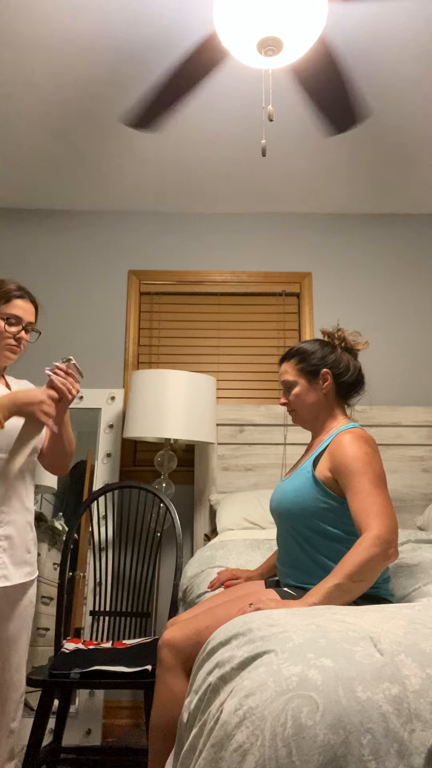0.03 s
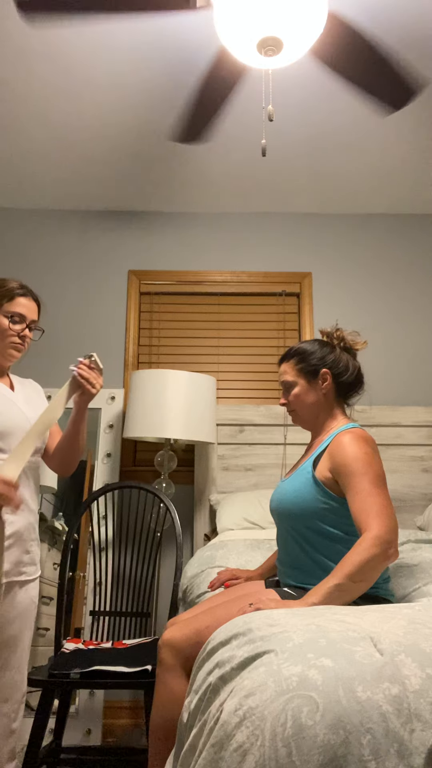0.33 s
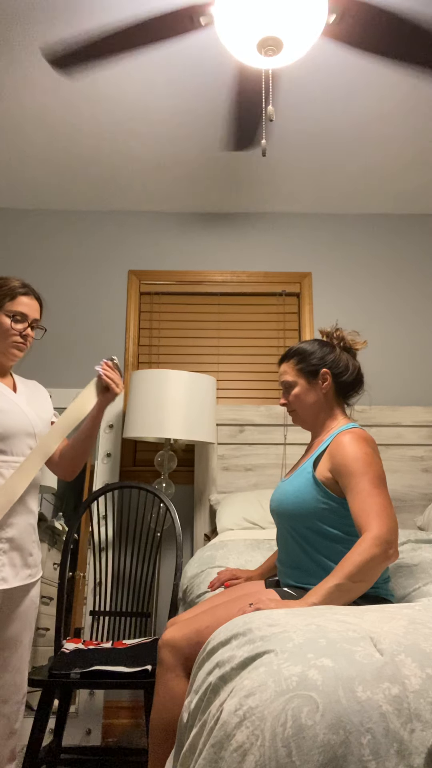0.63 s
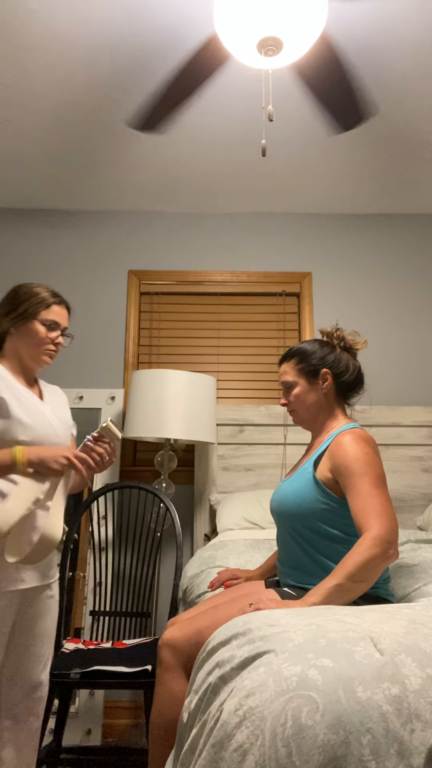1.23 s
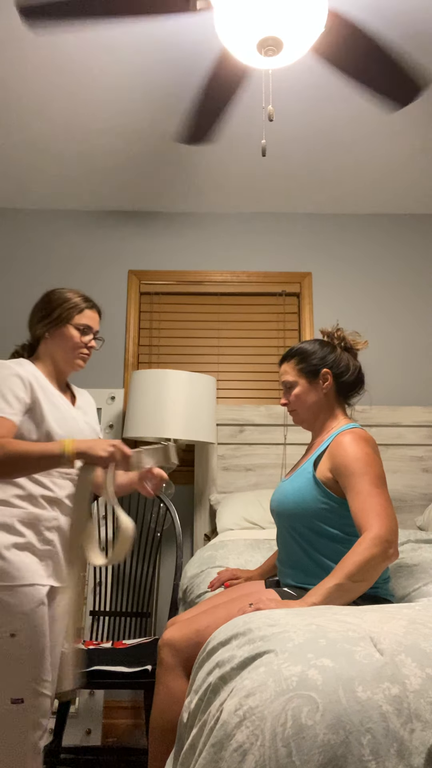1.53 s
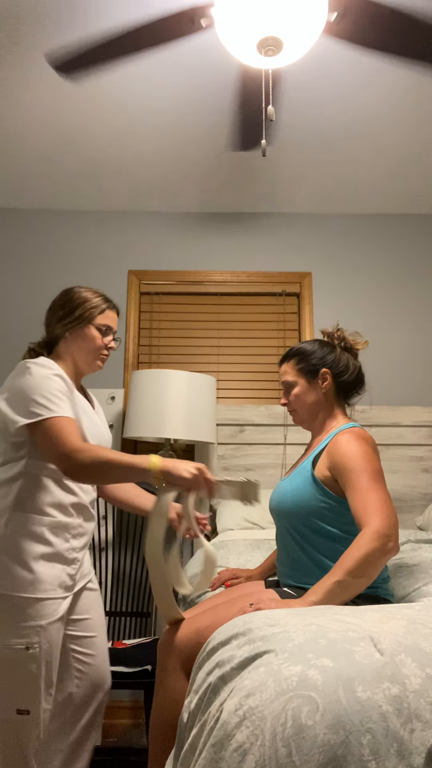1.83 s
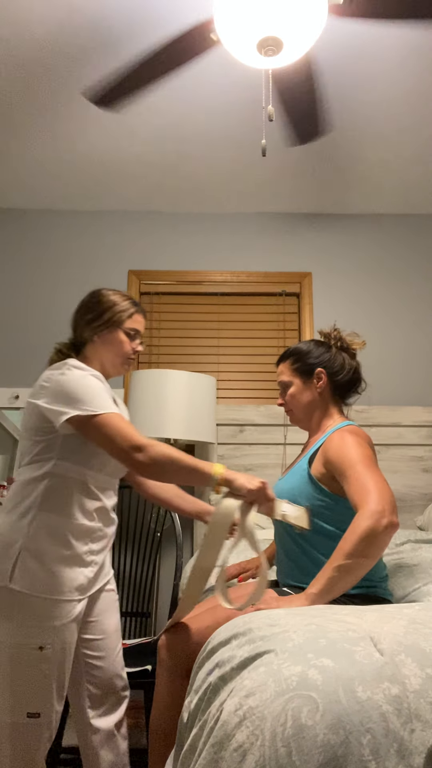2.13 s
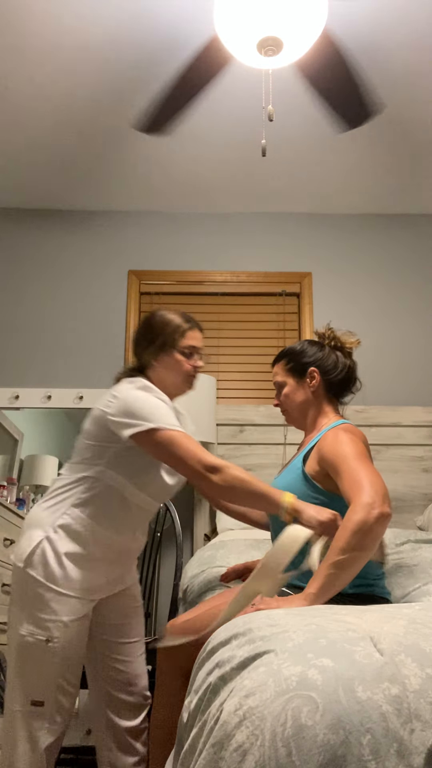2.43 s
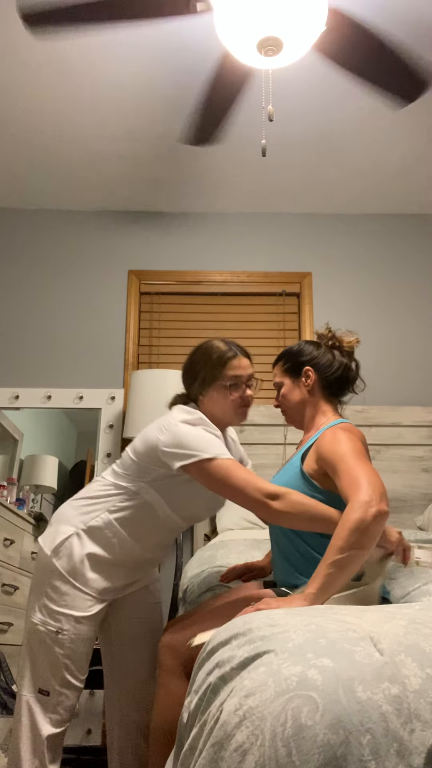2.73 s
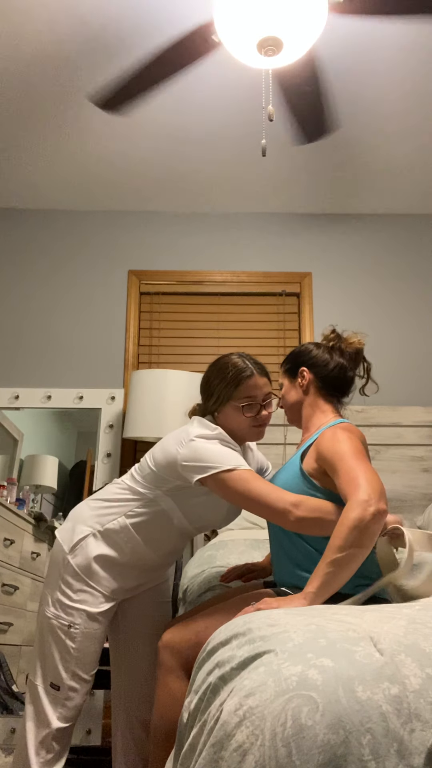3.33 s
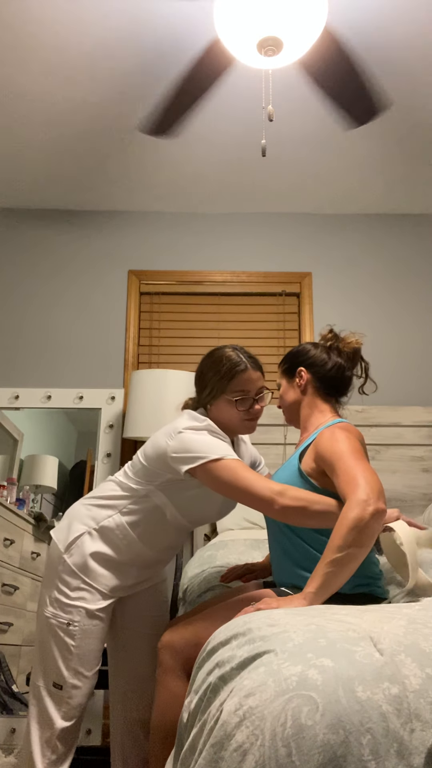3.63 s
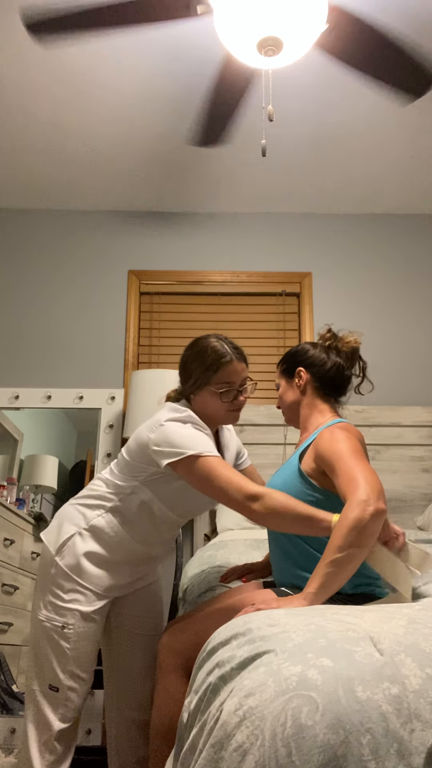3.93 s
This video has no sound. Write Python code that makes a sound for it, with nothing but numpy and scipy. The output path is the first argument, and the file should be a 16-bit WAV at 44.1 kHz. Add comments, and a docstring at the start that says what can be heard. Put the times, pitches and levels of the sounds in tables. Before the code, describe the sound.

Light clinks of a loose belt buckle, with strap rustle, soft knocks and a humming fan.

```python
"""Handling a webbing belt

A belt with a loose metal buckle is passed round someone's back in a small bedroom. Impacts excite the
buckle's normal modes, singly as clinks and in quick runs as chatter; blows damped by the hand are dull
knocks. Sliding friction makes the strap hiss and rasp, and a ceiling fan hums throughout."""
import sys
import numpy as np
from scipy import signal
from scipy.fft import rfft, irfft
from scipy.io import wavfile

SR = 44100
rng = np.random.default_rng(int(sys.argv[2]) if len(sys.argv) > 2 else 0)


def bounce(signal):
    """Save signal as a 16-bit WAV file at the path given by the first command-line argument."""
    frames = np.transpose(np.atleast_2d(signal))
    limited = np.clip(frames, -1, 1)
    pcm = np.round(limited * 32767).astype(np.int16)
    wavfile.write(sys.argv[1], SR, pcm)


N = 176400
TIME = np.arange(N) / SR

# Spectrum of the fan's moving air: f/Hz, relative density/dB
AIR_SPECTRUM = [(20, -29), (31, -24), (40, -9.5), (52, 2), (64, -3), (80, 2), (100, -9.5), (130, -8.5),
                (185, -13.5), (224, -12), (246, -14.5), (272, -11), (330, -18.5), (480, -23.5),
                (650, -29.5), (850, -31.5), (1400, -32), (2200, -30.5), (3200, -43), (6000, -57),
                (15000, -91)]
# Tones of the fan's motor: f/Hz, level/dB, waver/dB
MOTOR_TONES = [(59.4, -52, -0.3), (575.5, -71, 0.5)]
# Envelopes of the sliding hiss and of the weave's lower rasp: t/s, level/dB
HISS_ENVELOPE = [(0, -80), (.1, -55), (.3, -59), (.45, -60), (.64, -59.5), (.74, -58), (.83, -78.5),
                 (.95, -72.5), (1.17, -71), (1.24, -80), (1.35, -72.5), (1.62, -63), (1.72, -78),
                 (1.85, -66), (1.95, -78.5), (2.27, -72.5), (2.37, -69), (2.55, -71.5), (2.67, -64.5),
                 (2.87, -65), (2.98, -69.5), (3.1, -58.5), (3.39, -74.5), (3.56, -65.5), (3.69, -80.5),
                 (3.77, -67), (3.87, -89), (3.92, -67), (4, -75.5)]
RASP_ENVELOPE = [(0, -71), (.12, -54), (.2, -59.5), (.35, -50.5), (.5, -58.5), (.66, -52), (.8, -67),
                 (1.0, -61.5), (1.22, -69), (1.35, -64), (1.65, -62), (2.1, -67), (2.5, -67.5), (2.68, -57),
                 (2.88, -57.5), (3.1, -57), (3.38, -65.5), (3.57, -59.5), (3.7, -66), (4, -69)]
# Their spectra: f/Hz, relative density/dB
HISS_SPECTRUM = [(1500, -9.5), (3200, 2.5), (4400, 5.5), (6500, 3), (9000, 2), (12000, -2), (15500, -12.5)]
RASP_SPECTRUM = [(300, -12.5), (700, -8.5), (1100, -3.5), (1400, -5), (1800, 2), (2250, 1), (2650, -2.5),
                 (3200, -13), (6000, -35)]
# Places struck: the frame's side, corner and end, the tongue and its tip
STRIKE_PLACES = ["side", "corner", "end", "tongue", "tip"]
# Normal modes of the buckle: f/Hz, then excitation/dB for each place struck
NORMAL_MODES = [(1755, -0.5, -12, -18, -4.5, -21), (2830, -3, -8, -29, -12.5, -33),
                (3062, -25, -26, -8.5, -22, -28), (3612, -8, -4.5, -26, -8.5, -24),
                (4450, 3.5, 0, -6, -2.5, -21), (5280, -2, -2, -14, -0.5, -3.5),
                (5530, -18, -9, -13, -23, -24), (5843, -11, -3, -8, 3, -11), (6580, 0, -12, -8, -19, -25),
                (6720, -7, -7, -15, -11, -29), (7230, -24, -13, -7.5, -13, -17),
                (8730, 3, -3, 1.5, -2, -3.5), (9240, -4, -4, -17, -12, -19), (9410, -6, -12, -0.5, -1, -4),
                (10180, -1.5, -1, 1, 1, -7), (10400, -13, -11, -8, -4, -10), (10730, -14, -5, -5, -1, -3.5),
                (11740, -3, -12, -11, -10, -8), (12460, 0, -9, -14, -13, -17),
                (12950, -8, -13, -4, -14, -14), (13020, 2, -8, -6, -1, 2), (13800, -2, -5, -3, -9, -14),
                (14000, 1, -10, -12, 3, -4), (15000, 2.5, -6, -6, -13, -9), (15550, -6, -2, -14, -14, -20),
                (15500, -5, -11, -0.5, -13, -24)]
# Scratch of metal on metal: lower f/Hz, upper f/Hz, relative level/dB
SCRATCH_BANDS = [(3550, 7600, -1), (9200, 11900, 1)]
# Single impacts: t/s, place, level/dB, brightness/(dB/octave), ring gain/dB, T60 in the grip/s
CLINK_EVENTS = [(0.0209, "side", -22.5, 3, 8, 0.053), (0.079, "side", -18, 6, 0, 0.082),
                (.495, "tip", -37, 12, 0, .08), (0.657, "corner", -25, -1, -10, 0.056),
                (1.024, "tip", -34, 5, -17, 0.013), (1.038, "tip", -28.5, 0, -8, 0.079),
                (1.055, "tip", -20.5, 5, -11, .05), (1.2565, "tip", -29, 3, -7, .05),
                (1.302, "end", -36.5, 0, -6, 0.046), (1.5161, "tip", -19.5, 6, -6, .06),
                (1.553, "corner", -32.5, 0, -10, .03), (1.564, "tongue", -29.5, -1.5, -3, .06),
                (1.603, "corner", -41, 2, -12, .04), (1.635, "end", -36, 2, -10, .07),
                (2.748, "corner", -37, -8, -17, 0.024), (2.8088, "tip", -22.5, -6, 18, 0.079),
                (3.094, "tongue", -29, 0, -1, 0.046), (3.101, "tongue", -16.5, 0.5, 6, 0.068),
                (3.169, "tongue", -25.5, 4, 2, .06), (3.2205, "end", -23.5, 3, -3, 0.099),
                (3.238, "end", -18, 0.5, 4, 0.11), (3.434, "side", -20.5, 1.5, -2, 0.11),
                (3.488, "end", -32, -3, -5, 0.058)]
# The loose tongue chatters: t/s, place, duration/s, level/dB, brightness/(dB/octave), ring gain/dB
RATTLE_EVENTS = [(.024, "end", 0.013, -19.5, 2, -9.5), (0.087, "side", 0.048, -10, 0.5, -6),
                 (.124, "corner", 0.042, -13.5, 1, -3), (0.662, "corner", 0.026, -27, -8, -17),
                 (1.328, "end", .024, -35.5, -2, -13), (1.487, "corner", 0.03, -31.5, -4, -11),
                 (1.562, "corner", .1, -42, 1, -15), (3.095, "tongue", 0.031, -13.5, 1.5, -3),
                 (3.24, "end", 0.038, -17.5, 2, 3), (3.421, "end", 0.046, -21.5, -4, -2),
                 (3.441, "side", 0.029, -21.5, -1, -2)]
# Knocks of strap and buckle in the hand: t/s, clack level/dB, thump level/dB, tick level/dB
KNOCK_EVENTS = [(0.365, -27.5, -42, -37), (.99, -27, -55, -55), (1.023, -28.5, -19.5, -35),
                (1.4294, -17.5, -16, -29.5), (1.7367, -23, -51, -32), (1.8404, -33, -23.5, -34.5),
                (2.401, -26, -21, -49), (2.644, -37, -26, -42), (2.748, -19.5, -28, -27),
                (2.7532, -27, -30, -34), (3.057, -31.5, -32, -33), (3.8077, -28, -34, -47)]
# Modes of the gripped buckle in a knock: f/Hz, relative level/dB, T60/s
GRIPPED_MODES = [(520, -8.5, 0.0049), (1147, -4, 0.022), (1458, -0.5, 0.0057), (1963, 1.5, 0.0053),
                 (2217, 0, 0.012), (2515, -5.5, 0.01), (3300, -19, .005)]
# Stereo width of the diffuse field: f/Hz, side minus mid/dB
FIELD_WIDTH = [(60, -47), (110, -22), (200, -21.5), (380, -8), (700, 3), (1290, -8), (2380, -5),
               (4400, -0.5), (7000, -13.5), (11000, -7), (14000, -71)]
# Level difference between the channels: f/Hz, left minus right/dB
LEFT_EXCESS = [(60, -0.5), (170, 2), (350, 2.5), (700, 3), (1400, 2), (2800, 3), (5600, 1.5), (9000, -1.5)]
# Phase delay of the left channel: f/Hz, lag/rad
LEFT_LAG = [(0, 0), (2200, .9), (3200, 1.2), (4000, .4), (4450, 1.3), (5100, 1.7), (6000, .4), (7700, .5),
            (9000, 1.4), (11000, 2.1), (13200, 2.65), (14100, np.pi), (15700, 3.06)]


def from_db(db):
    """Amplitude ratio of a level in decibels."""
    return 10 ** (np.asarray(db) / 20)


def rms_one(x):
    """Normalisation to unit rms."""
    return x / np.sqrt(np.mean(x ** 2) + 1e-20)


def energy_one(x):
    """Normalisation to unit energy."""
    return x / np.sqrt(np.sum(x ** 2) + 1e-20)


def decay(t, t60):
    """Exponential damping: the level falls 60 dB in t60 seconds."""
    return from_db(-60 * t / t60)


def shaped(x, spectrum, share=1):
    """Zero-phase filtering by a curve of f/Hz, gain/dB; share scales the decibels."""
    hz, db = np.transpose(spectrum)
    size = x.shape[-1]
    grid = np.maximum(np.fft.rfftfreq(size, 1 / SR), 1)
    return irfft(rfft(x) * from_db(share * np.interp(np.log(grid), np.log(hz), db)), size)


def band(x, low_hz, high_hz):
    """Causal band-pass filtering with gentle slopes."""
    return signal.sosfilt(signal.butter(2, [low_hz, high_hz], "band", fs=SR, output="sos"), x + 1e-18)


def drift(corner_hz):
    """Random fluctuation: low-passed noise of unit rms."""
    r = np.exp(-2 * np.pi * corner_hz / SR)
    return rms_one(signal.lfilter([1], [1, -2 * r, r * r], rng.standard_normal(N + SR))[SR:])


def ring(force, hz, t60):
    """Response of a damped harmonic oscillator, at unit energy."""
    r, w = decay(1 / SR, t60), 2 * np.pi * hz / SR
    return energy_one(signal.lfilter([1, 0, -1], [1, -2 * r * np.cos(w), r * r], force + 1e-18))


def add(out, start_s, sound):
    """Superposition of a sound from a given instant."""
    i = int(start_s * SR)
    out[..., i:i + sound.shape[-1]] += sound[..., :N - i]


def diffuse(mid, side):
    """Partial coherence: two independent signals form a diffuse stereo field of unit rms."""
    return rms_one(mid + shaped(side, FIELD_WIDTH) * [[1], [-1]])


def bedroom(direct, room_db, room_t60=0.19, furniture_t60=0.076, build_s=0.0026):
    """Reverberation: dense reflections off near furniture and a short tail join the direct sound."""
    t = TIME[:SR // 2]
    fade = decay(t, room_t60) + from_db(1) * decay(t, furniture_t60)
    build = 1 - np.exp(-t / build_s)
    echoes = np.sqrt(2) * energy_one(diffuse(*rng.standard_normal((2, len(t)))) * fade * build)
    return direct + from_db(room_db) * signal.fftconvolve(direct[None], echoes, axes=1)[:, :N]


def fan(air_db=-48.5):
    """Flow noise: moving air rumbles beneath motor tones that waver in amplitude."""
    air = rms_one(shaped(diffuse(*rng.standard_normal((2, N))), AIR_SPECTRUM))
    hum = sum(from_db(db) * rms_one(np.sin(2 * np.pi * hz * TIME) * from_db(waver * drift(corner_hz=3)))
              for hz, db, waver in MOTOR_TONES)
    return from_db(air_db) * air + hum


def sliding_strap(envelope, spectrum, snags_per_s=990, snag_db=-6, flutter_db=0.5):
    """Sliding friction: continuous noise, with tiny impulses where the weave snags."""
    snags = (rng.random(N) < snags_per_s / SR) * from_db(-1.5 * np.minimum(rng.exponential(1, N), 4))
    snags *= rng.choice([-1, 1], N)
    friction = diffuse(*rng.standard_normal((2, N))) + from_db(snag_db) * rms_one(snags)
    level_db = np.interp(TIME, *np.transpose(envelope)) + flutter_db * drift(corner_hz=60)
    return rms_one(shaped(friction, spectrum)) * from_db(level_db)


def struck_metal(contacts, place, brightness_db, ring_db, t60, scratch_db=-6.5, grip_detune=0.0012):
    """Modal excitation: contacts scratch and ring; place weights the modes, grip damps and shifts them."""
    t = TIME[:SR // 20]
    burst = rng.standard_normal(len(t)) * decay(t, t60=0.013)
    scratch = signal.fftconvolve(contacts, burst)[:len(contacts)]
    out = sum(from_db(scratch_db + db) * energy_one(band(scratch, low, high))
              for low, high, db in SCRATCH_BANDS)
    for hz, *excitation_db in NORMAL_MODES:
        tilt_db = brightness_db * np.log2(hz / 9000)
        scatter_db = 2.5 * rng.normal()
        gain = from_db(excitation_db[STRIKE_PLACES.index(place)] + ring_db + tilt_db + scatter_db)
        out += rng.choice([-1, 1]) * gain * ring(contacts, hz * (1 + grip_detune * rng.normal()), t60)
    return energy_one(out)


def buckle(contacts_per_s=400):
    """Impact excitation: one impulse gives a clink, a train that swells and dies gives a rattle."""
    out, size = np.zeros(N), SR // 3
    for start_s, place, db, *tone in CLINK_EVENTS:
        add(out, start_s, from_db(db) * struck_metal(signal.unit_impulse(size), place, *tone))
    for start_s, place, duration, db, *tone in RATTLE_EVENTS:
        when = (np.arange(100) + rng.random(100)) / contacts_per_s
        swell = np.sqrt(np.maximum(np.sin(np.pi * np.minimum(when / duration, 1)), 0))
        contacts = np.zeros(size)
        contacts[(when * SR).astype(int)] = swell * rng.choice([-1, 1], len(when))
        add(out, start_s, from_db(db) * struck_metal(contacts, place, *tone, t60=0.074))
    return bedroom(out, room_db=-1)


def thump(rise_s=0.0037, side_db=-6):
    """Reverberant growth and decay: the low body of a knock builds and dies away in the room."""
    t = TIME[:SR // 3]
    mid, side = band(rng.standard_normal((2, len(t))), low_hz=271, high_hz=1200)
    envelope = (1 - np.exp(-t / rise_s)) * decay(t, t60=0.22)
    return np.sqrt(2) * energy_one(diffuse(mid, from_db(side_db) * side) * envelope)


def knocks(detune=0.04):
    """Heavy damping: the hand shortens each blow to a clack, with a thump below and a tick above."""
    out, thumps, impulse = np.zeros(N), np.zeros((2, N)), signal.unit_impulse(SR // 10)
    tick = energy_one(band(impulse, low_hz=2600, high_hz=5960))
    for start_s, clack_db, thump_db, tick_db in KNOCK_EVENTS:
        clack = sum((-1) ** k * from_db(db) * ring(impulse, hz * (1 + detune * rng.normal()), t60)
                    for k, (hz, db, t60) in enumerate(GRIPPED_MODES))
        add(out, start_s, from_db(clack_db) * energy_one(clack) + from_db(tick_db) * tick)
        add(thumps, start_s, from_db(thump_db) * thump())
    return bedroom(out, room_db=1.5) + thumps


def scene():
    """Linear superposition: the pressures of fan, strap, buckle and knocks add."""
    return (fan() + sliding_strap(HISS_ENVELOPE, HISS_SPECTRUM)
            + sliding_strap(RASP_ENVELOPE, RASP_SPECTRUM) + buckle() + knocks())


def record(dry):
    """Level and phase differences: the left channel lags and is mostly louder; both are low-passed."""
    lag = np.interp(np.fft.rfftfreq(N, 1 / SR), *np.transpose(LEFT_LAG))
    left, right = shaped(dry[0], LEFT_EXCESS, 1 / 2), shaped(dry[1], LEFT_EXCESS, -1 / 2)
    late_left = irfft(rfft(left) * np.exp(-1j * lag), N)
    low_pass = signal.ellip(10, .2, 70, 15850, fs=SR, output="sos")  # steep cut above 15850 Hz
    return signal.sosfilt(low_pass, np.array([late_left, right]))


dry = scene()
out = record(dry)
bounce(out)
```